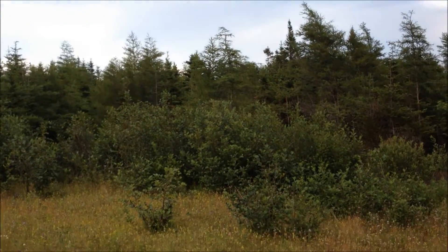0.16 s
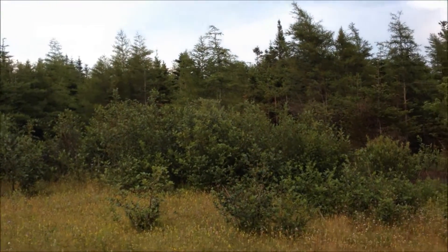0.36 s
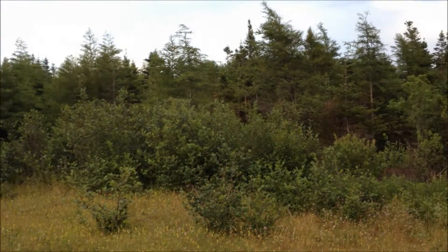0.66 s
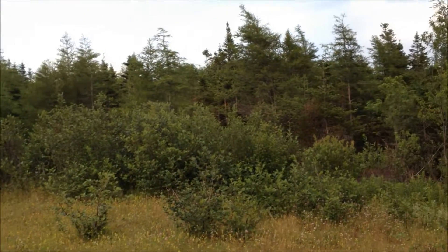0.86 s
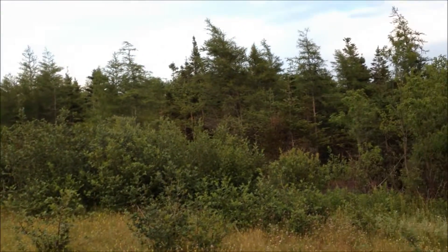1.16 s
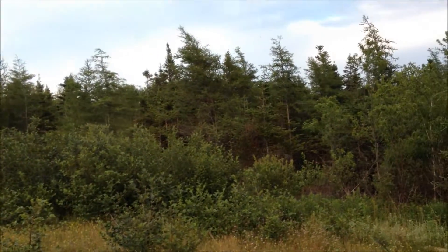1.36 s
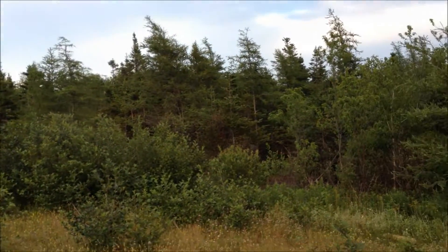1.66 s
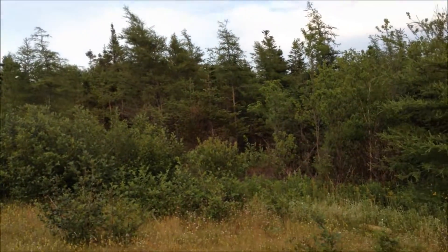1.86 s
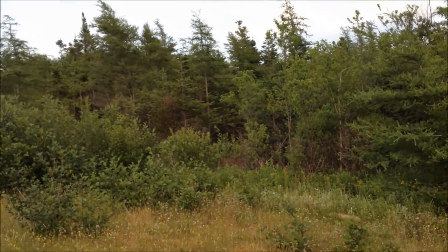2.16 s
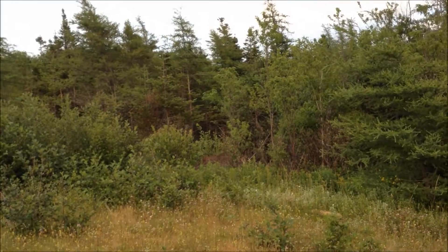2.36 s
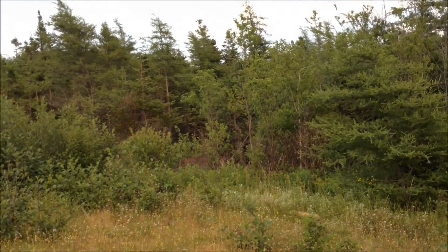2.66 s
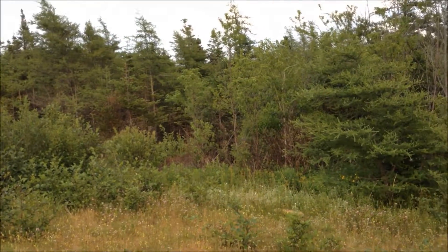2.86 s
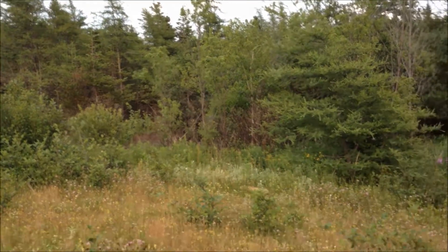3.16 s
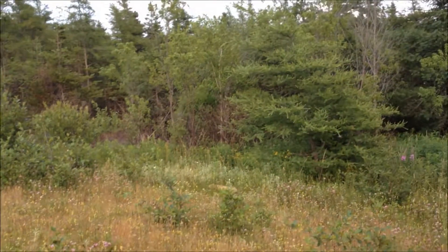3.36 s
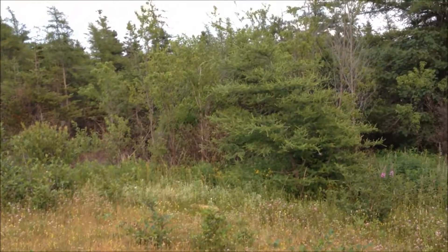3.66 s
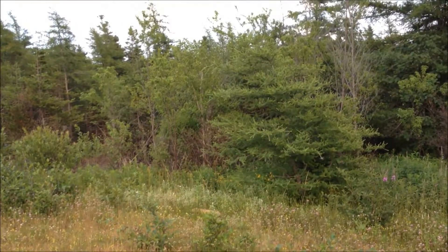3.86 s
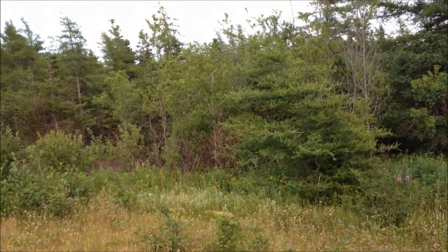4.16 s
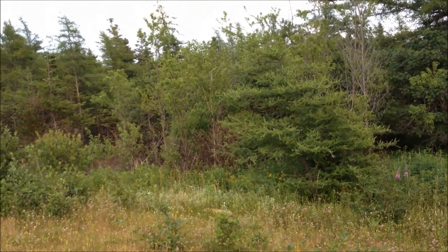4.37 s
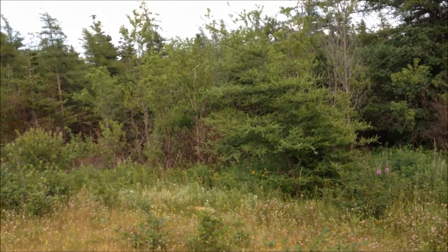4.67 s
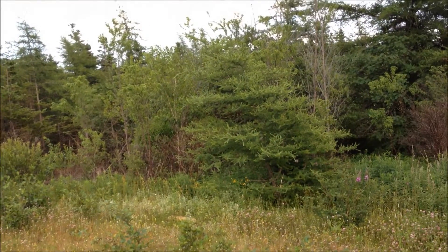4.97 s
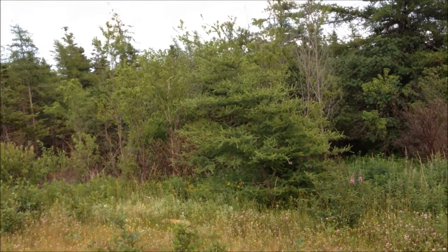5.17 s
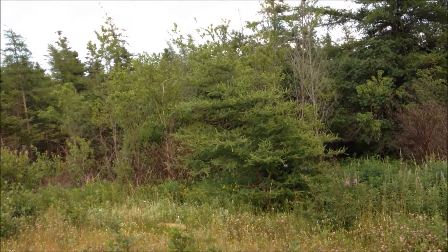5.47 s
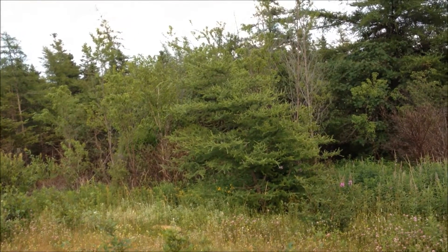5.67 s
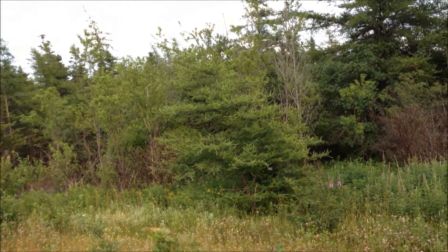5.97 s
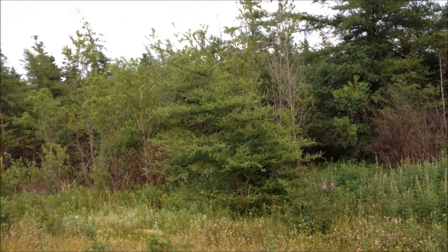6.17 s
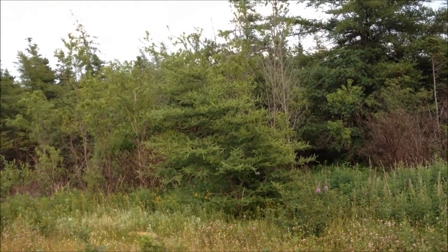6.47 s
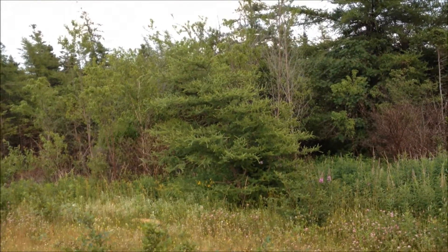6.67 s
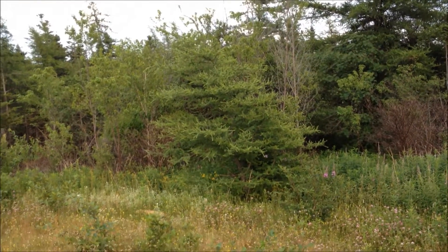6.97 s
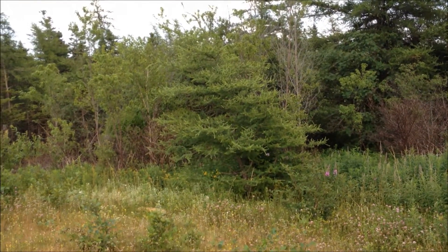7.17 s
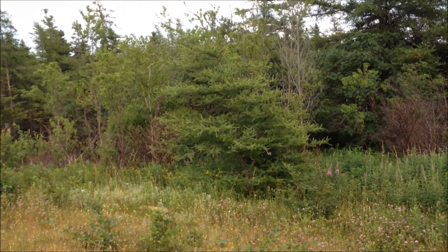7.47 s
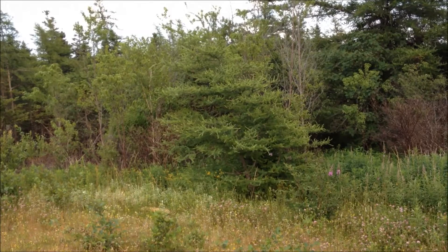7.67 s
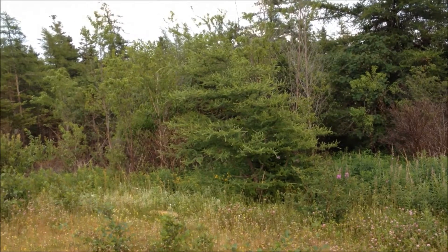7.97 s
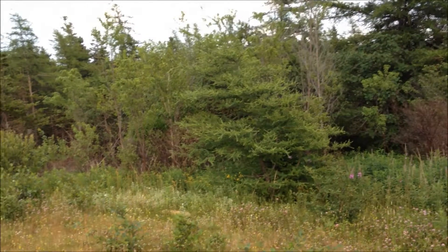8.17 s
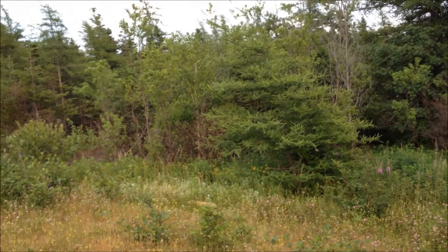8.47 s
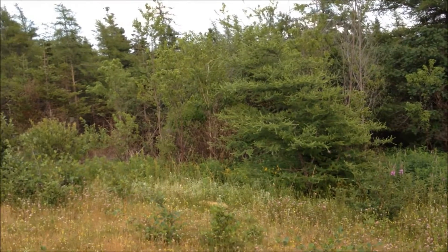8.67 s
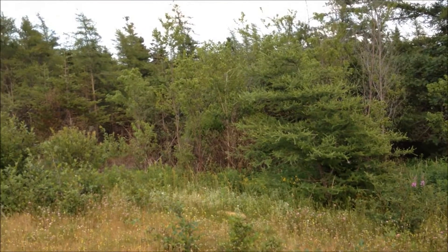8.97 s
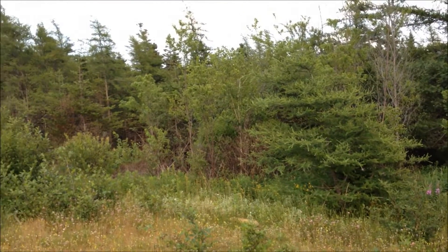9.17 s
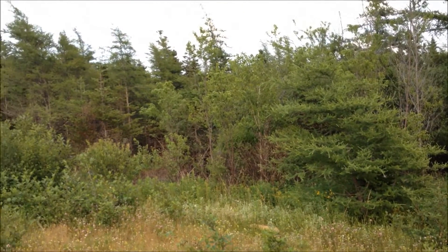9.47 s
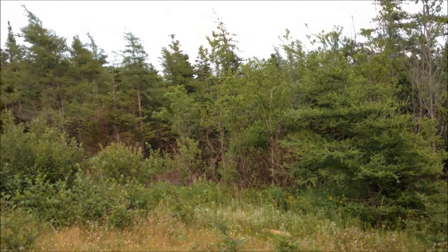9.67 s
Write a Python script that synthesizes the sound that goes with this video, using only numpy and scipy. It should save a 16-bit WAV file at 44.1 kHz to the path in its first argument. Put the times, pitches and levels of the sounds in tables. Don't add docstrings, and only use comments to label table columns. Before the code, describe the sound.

Outdoors at a wood's edge, the echo of a rough call dies away, then young hounds bay tens of metres off in long pitched cries with quick yelps at the onset. A pause holds faint bird twitter, wind thumps and grass rustle; then rougher, raspy overlapping bays return, with a thin squeal near the end. The microphone is handheld, with faint air hiss.

```python
import sys
import numpy as np
from scipy import signal
from scipy.fft import rfft, irfft
from scipy.io import wavfile
from scipy.ndimage import uniform_filter1d

SR = 44100
rng = np.random.default_rng(int(sys.argv[2]) if len(sys.argv) > 2 else 0)


def voltage_ratio(level):
    return 10 ** (np.asarray(level, float) / 20)


def store_pcm(level_fs):
    pcm = np.round(np.clip(level_fs, -1, 1) * 32767).astype(np.int16)
    wavfile.write(sys.argv[1], SR, np.atleast_2d(pcm).T)


N = 433062
T = np.arange(N) / SR


def evened(x):
    return x / np.sqrt(np.mean(x ** 2) + 1e-20)


def read(points, hz):
    f, value = np.transpose(points)
    return np.interp(np.log(hz + 1), np.log(f + 1), value)


def add(mix, s, sound):
    part = mix[round(s * SR):][:len(sound)]
    part += sound[:len(part)]


def unroll(rows):
    s, *columns = np.transpose(rows)
    t = np.arange(s[0], s[-1], 1 / SR)
    return t, [np.interp(t, s, c) for c in columns]


def phase(hz):
    return 2 * np.pi * np.cumsum(hz) / SR


def resonate(x, hz, width):
    b, a = signal.iirpeak(hz, hz / width, SR)
    return signal.lfilter(b, a, signal.lfilter(b, a, x))


def wander(length, span):
    size = int(span * SR)
    return evened(uniform_filter1d(uniform_filter1d(rng.standard_normal(length), size), size))


def coloured(colour):
    gain = voltage_ratio(read(colour, np.fft.rfftfreq(N, 1 / SR)))
    return evened(irfft(rfft(rng.standard_normal(N)) * gain, N))


# f/Hz, level/dB per Hz
AIR_COLOUR = [(40, -53), (100, -20), (170, -3.5), (350, -3.5), (700, -7), (1200, -10), (2500, -13),
              (5000, -16), (8000, -19.5), (10000, -23.5), (12500, -20.5), (15000, -17)]


def air():
    return voltage_ratio(-68) * coloured(AIR_COLOUR)


# f/Hz, level/dB per Hz
WIND_COLOUR = [(30, -36.5), (60, -19), (110, -1), (160, 0), (220, -8), (300, -21.5), (400, -59)]
# t/s of arrival, rumble level/dB
BREEZES = [
    (3.301, -83),
    (6.55, -79.5),
]
# t/s of the middle, length/s, level/dB
GUSTS = [
    (0.01, 0.027, -73),
    (.28, .1, -99),
    (3.3, 0.11, -56),
    (3.445, 0.027, -53),
    (4.6, 0.18, -74),
    (6.434, 0.13, -74),
    (7.5, .02, -74),
    (7.645, 0.016, -78),
]
# t/s, peak level/dB, f/Hz
EDDIES = [(3.239, -40, 123), (3.333, -35, 145.2), (3.413, -42, 161), (4.57, -47, 164), (4.643, -49.5, 101),
          (6.446, -38, 143), (6.715, -58, 145), (6.897, -54, 185), (7.108, -50, 192), (7.495, -50, 132),
          (7.631, -53, 127)]


def wind():
    rise, fall, gust_edge = 69, 8.4, 880
    calm_db, calm_rumble_db, buffet_over_rumble_db = -82, -101, 12
    breeze = sum(voltage_ratio(db - np.maximum(rise * (s - T), fall * (T - s))) for s, db in BREEZES)
    gusts = sum(voltage_ratio(db - gust_edge * np.maximum(abs(T - s) - length / 2, 0)) for s, length, db in GUSTS)
    buffet = voltage_ratio(calm_db) + voltage_ratio(buffet_over_rumble_db) * breeze + gusts
    out = buffet * voltage_ratio(-3.5 + 0.99 * wander(N, 0.0093)) * coloured(WIND_COLOUR)
    rumble = coloured([(30, -15.0), (75, 10.5), (130, -25.0)])
    out += (voltage_ratio(calm_rumble_db) + breeze) * voltage_ratio(1.5 * wander(N, 0.043)) * rumble
    for s, db, hz in EDDIES:
        t = np.arange(0, 2.46 / hz, 1 / SR)
        add(out, s, voltage_ratio(db - 5.5) * np.cos(2 * np.pi * hz * (t - t[-1] / 2)) * np.hanning(len(t)))
    return out


# t/s of the middle, length/s, level/dB, upper edge f/Hz
RUSTLES = [
    (0.072, .005, -60, 5000),
    (0.239, .044, -46.5, 2900),
    (4.317, 0.041, -62, 3200),
    (4.705, 0.11, -75.5, 1810),
    (5.282, 0.061, -75, 3000),
    (5.565, 0.025, -66.5, 4000),
    (8.892, 0.02, -66, 9200),
    (9.451, 0.027, -65, 965),
    (8.59, 0.14, -72.5, 7000),
    (8.79, 0.17, -71, 8500),
]
# t/s, length/s, f/Hz, level/dB
CREAKS = [
    (0.188, 0.0058, 333, -68),
    (5.247, 0.025, 650, -77),
    (5.548, 0.043, 466, -76),
]


def handling():
    out = np.zeros(N)
    for s, length, db, edge_hz in RUSTLES:
        grit = rng.standard_normal(9000) * voltage_ratio(1.6 * wander(9000, 0.0024))
        band = signal.butter(3, [220, edge_hz], "band", fs=SR)
        dull = signal.lfilter(*band, grit)[:int(length * 1.4 * SR)]
        add(out, s - 0.62 * length, voltage_ratio(db) * evened(dull) * signal.windows.tukey(len(dull), .8))
    for s, length, hz, db in CREAKS:
        t = np.arange(0, length, 1 / SR)
        add(out, s, voltage_ratio(db + 16.5) * np.sin(2 * np.pi * hz * t) * np.hanning(len(t)))
    return out


# t/s, length/s, start f/Hz, end f/Hz, level/dB
CHIPS = [
    (0.197, 0.055, 8560, 7400, -58),
    (3.221, 0.031, 8250, 7540, -63),
    (3.62, .22, 4050, 3950, -77),
    (7.375, .04, 7350, 6600, -66),
    (8.868, 0.02, 8600, 6150, -41),
    (8.875, 0.0127, 8400, 6740, -41),
    (8.886, 0.012, 6400, 4370, -60),
]
# t/s, f/Hz, level/dB
TWEETS = [(1.168, 7100, -64), (1.238, 7430, -69), (1.315, 7500, -65), (1.36, 7110, -67),
          (1.408, 7500, -65.5), (1.45, 7400, -69), (1.49, 7370, -69), (1.52, 7540, -67), (1.55, 7300, -66),
          (1.608, 7400, -62), (1.643, 7550, -69), (1.70, 7200, -72)]
# t/s, length/s, start f/Hz, warble rate/Hz, level/dB
TRILLS = [
    (3.793, 0.19, 7550, 18.5, -60),
    (4.092, 0.08, 7620, 23, -56.5),
]


def bird():
    tweet_s, tweet_rise_hz, warble_hz, sag_hz_per_s = 0.045, 120, 330, 1700
    out = np.zeros(N)
    notes = [(*row, 0, 0) for row in CHIPS]
    for s, hz, db in TWEETS:
        notes.append((s, tweet_s, hz - tweet_rise_hz / 2, hz + tweet_rise_hz / 2, db, 0, 0))
    for s, length, hz, rate, db in TRILLS:
        notes.append((s, length, hz, hz - sag_hz_per_s * length, db, rate, warble_hz))
    for s, length, from_hz, to_hz, db, rate, swing_hz in notes:
        t = np.arange(0, length, 1 / SR)
        glide = from_hz + (to_hz - from_hz) * t / length
        hz = glide + swing_hz * np.cos(2 * np.pi * rate * t) + 60 * wander(len(t), 0.0021)
        fade_db = 4.0 * (from_hz - to_hz) / 1000 * t / length
        shape = signal.windows.tukey(len(t), .6 if length > .025 else 1)
        shape = shape * voltage_ratio(3.2 * wander(len(t), 0.0072) - fade_db)
        add(out, s, voltage_ratio(db - 5.5) * shape * np.sin(phase(hz)))
    return out


# f/Hz, width/Hz, level/dB
EARLIER_LINES = [
    (760, 380, 0),
    (1068, 140, 6.5),
    (1233, 220, 7.5),
    (2030, 190, -1),
    (2520, 160, -4.5),
]


def earlier():
    noise = rng.standard_normal(N)
    lines = sum(voltage_ratio(db) * resonate(noise, f, w) for f, w, db in EARLIER_LINES)
    return voltage_ratio(-49.5 - 60 * T) * evened(lines)


def squeak(rows):
    t, (hz, db, octave_db) = unroll(rows)
    turn = phase(uniform_filter1d(hz, 200))
    tone = voltage_ratio(db + 7.5) * np.sin(turn) + voltage_ratio(octave_db + 13.0) * np.sin(2 * turn)
    return t[0], tone * signal.windows.tukey(len(t), min(800 / len(t), 1))


# t/s, pitch f/Hz, level/dB, octave level/dB
SQUEAL = [
    (7.89, 1269, -44, -69),
    (7.914, 1326, -42.5, -56.5),
    (7.946, 1359, -36, -77),
    (8.028, 1272, -41.5, -55.5),
    (8.076, 1214, -52.5, -88),
    (8.214, 1317, -56.5, -86),
    (8.3, 1240, -71, -86),
]


def squeal():
    return squeak(SQUEAL)


# t/s, length/s, start f/Hz, end f/Hz, peak level/dB
YELPS = [
    (0.827, 0.056, 1242, 880, -50),
    (1.882, 0.055, 1068, 961, -46),
    (2.063, 0.044, 989, 887, -47.5),
    (3.396, 0.071, 1156, 843, -36),
    (5.92, 0.057, 1160, 1385, -44),
    (7.4, 0.053, 990, 983, -44),
]
YELP_SHRILL = [6, 9, 0, -11, 5, 1.5]


def yelps():
    steps = [(0, 0, -9.5, -25), (0.381, 0.706, 0, 0), (1, 1, -19, 0)]
    out = np.zeros(N)
    for (s, length, from_hz, to_hz, db), shrill_db in zip(YELPS, YELP_SHRILL):
        octave_db = db + shrill_db - 21.5 + .05 * (from_hz - 1000)
        rows = [(s + u * length, from_hz + g * (to_hz - from_hz), db + d, octave_db + d + o)
                for u, g, d, o in steps]
        add(out, *squeak(rows))
    return out


# f/Hz, level/dB
OVERTONES = [(2100, 5), (2700, -17), (3150, -20), (3500, -31.5), (4100, -31), (5000, -62), (7500, -55),
             (9500, -70)]


def clean_stack(turn, hz, third_db, fourth_db, bright, gap_db):
    size = len(turn)

    def overtone(k):
        level = voltage_ratio(read(OVERTONES, k * hz) + 0.48 * k * wander(size, 0.027))
        return level * np.cos(k * turn + .4 * k * k)

    upper = voltage_ratio(gap_db) * (overtone(6) + overtone(7)) + sum(overtone(k) for k in range(8, 18))
    return_top = overtone(5) + bright * upper
    return (np.cos(2 * turn), voltage_ratio(third_db) * np.cos(3 * turn + 1),
            voltage_ratio(fourth_db) * (np.cos(4 * turn + 2)), voltage_ratio(fourth_db) * return_top)


# f/Hz, level/dB
HALVES = [(1330, 4), (1850, 0), (2400, 1.5), (2900, -29)]


def half_pitch(turn, hz, low_half_db, deep):
    halves = 0
    for k in range(5, 13, 2):
        level = voltage_ratio(read(HALVES, k * hz / 2) + 4.9 * wander(len(turn), 0.042))
        halves = halves + level * np.cos(k * turn / 2)
    lowest = 0.14 * voltage_ratio(low_half_db) * deep * np.cos(3 * turn / 2)
    return evened(halves) + lowest


def loose_folds(turn, hz):
    size = len(turn)
    puffs = (0.22 + np.cos(turn / 2) ** 2) * rng.standard_normal(size) * voltage_ratio(6.0 * wander(size, 0.0045))
    slips = turn / 2 + phase(0.038 * hz * wander(size, 0.01607))
    lines = sum(np.cos(k * slips + k * k) for k in range(2, 12))
    return evened(lines) + 0.8 * evened(puffs)


# f/Hz, width/Hz, level/dB
RASP = [
    (610, 110, -8),
    (1021, 760, 19),
    (1359, 88, 4),
    (1950, 330, 11),
    (2534, 270, 6.5),
]


def throat_rasp(chaos, low_hz, low_gain, high_rasp_db):
    tuned = [(low_hz, *RASP[0][1:])] + RASP[1:]
    bands = [voltage_ratio(db) * evened(resonate(chaos, f, w)) for f, w, db in tuned]
    middle = signal.lfilter(*signal.butter(2, 730, "high", fs=SR), sum(bands[1:3]))
    noise = low_gain * bands[0] + middle + voltage_ratio(high_rasp_db) * sum(bands[3:])
    noise = noise * voltage_ratio(2.6 * wander(len(chaos), .004))
    throat = signal.cheby1(8, 1, [460, 2700], "band", fs=SR, output="sos")
    return evened(signal.sosfilt(throat, noise))


def escaping_air(turn):
    size = len(turn)
    streaks = 0
    for k in range(10, 18):
        streaks = streaks + wander(size, 0.004) * voltage_ratio(4.3 * wander(size, 0.08)) * np.cos(k * turn)
    return evened(streaks) + 1.5 * rng.standard_normal(size)


def bay(rows, manner, throat, gap_db, low_hz, third_shift_db):
    chest_from_db, chest_to_db, half_db, nasal_db, top_db = manner
    high_rasp_db, release_s, low_half_db, low_rasp_db = throat
    t, (hz, effort_db, mouth, rasp_db) = unroll(rows)
    size, age = len(t), t - t[0]
    share = age / (t[-1] - t[0])

    third_db = np.interp(mouth, [0, 1], [-22.5, 16]) + np.interp(share, [0, 1], third_shift_db)
    fourth_db = np.interp(mouth, [0, 1], [-25.5, 13.5]) + nasal_db
    second_db = effort_db - 10 * np.log10(1 + voltage_ratio(2 * third_db) + voltage_ratio(2 * fourth_db))
    rasp, half = voltage_ratio(rasp_db), voltage_ratio(half_db + 0.65 * rasp_db)
    bright = voltage_ratio(top_db - 13 * (share - 1.5)) * np.minimum(age / .04, 1) ** 2
    bright = bright * (1 + .2 * wander(size, 0.0077)) * np.clip(1 - rasp, 0, 1) ** 2
    deep = voltage_ratio(17 * share ** 5)

    hz = uniform_filter1d(hz, 500)
    steady = phase(uniform_filter1d(hz, 900))
    hz = hz * (1 + (0.0013 + 0.012 * rasp) * wander(size, 0.0064))
    turn = phase(hz)
    chest = voltage_ratio(chest_from_db + (chest_to_db - chest_from_db) * share) * np.minimum(age / 0.071, 1)
    chest = chest * np.minimum((t[-1] - t) / release_s, 1) * np.cos(steady)

    beads = [voltage_ratio((3.0 + 4.6 * rasp) * np.minimum(wander(size, 0.023), 1)) for _ in range(3)]
    second, third, fourth, top = clean_stack(turn, hz, third_db, fourth_db, bright, gap_db)
    clean = beads[0] * second + beads[1] * third + beads[2] * fourth + top
    halves = half_pitch(turn, hz, low_half_db, deep)
    chaos = loose_folds(turn, hz)
    noise = throat_rasp(chaos, low_hz, voltage_ratio(low_rasp_db) * deep, high_rasp_db)
    gasps = escaping_air(turn)
    nearing = voltage_ratio(1.62 * t[0])
    haze = nearing * voltage_ratio(-46.5 + 1.6 * wander(size, 0.044)) * evened(resonate(gasps, 6860, 3100))
    grain = voltage_ratio(-42) * evened(resonate(gasps, 3750, 720))
    leak = voltage_ratio(-24) * (1 - share) * evened(resonate(chaos + gasps, 3200, 520))

    effort = uniform_filter1d(voltage_ratio(effort_db), 2500)
    voice = voltage_ratio(second_db + 5.5) * np.sqrt(np.clip(1 - rasp ** 2, .15, 1)) * clean
    voice += voltage_ratio(2.0) * chest
    voice += effort * (half * halves + rasp * (noise + leak) + haze + grain)
    return t[0], voice * signal.windows.tukey(size, 1300 / size)


# t/s, pitch f/Hz, effort level/dB, mouth opening/0-1, rasp level/dB against effort
PUSH_1 = [(.845, 546.4, -38, 0.4, 2), (.881, 588.2, -37.5, 0.81, -24), (.959, 572, -40, 0.37, -30),
          (.985, 561.5, -47, 0.58, -8), (1.01, 530, -30, 0.9, -6.5)]
PUSH_2 = [(.995, 529.4, -47, 0.94, -5.5), (1.027, 516.8, -39.5, 1, -20), (1.071, 562.3, -34.5, 0.31, -52),
          (1.151, 526.5, -38, 0.96, -15.5), (1.254, 510.6, -37.5, 0.23, -27.5),
          (1.336, 530, -38, 0.88, -55), (1.432, 506.2, -40, 0.45, -24), (1.5, 499.8, -38, 0.4, -20.5),
          (1.562, 495, -41.5, 0.33, -12.5), (1.603, 492, -51.5, 0.59, 6)]
PUSH_3 = [(2.065, 504.5, -42.5, 0.74, -5), (2.129, 570, -33.5, 0.63, -43.5), (2.18, 534, -33, 0.61, -45),
          (2.398, 526.6, -33.5, 0.31, -50), (2.527, 533.7, -38, 0.75, -37.5), (2.677, 507, -32, 0.43, -44),
          (2.739, 524, -35.5, 0.65, -36), (2.874, 531.8, -31.5, 0.65, -38.5),
          (2.97, 520.5, -33.5, 0.55, -33.5)]
PUSH_4 = [(2.958, 524.2, -34, 0.75, -15), (2.996, 525.2, -39, 0.72, -6.5), (3.019, 505.8, -40.5, 0.87, -5),
          (3.055, 520.8, -39.5, 0.41, -1), (3.091, 494.6, -45, 0.3, -7), (3.124, 498.4, -48, 0.3, 0.5),
          (3.17, 497, -69, 0.3, 1)]
PUSH_5 = [(3.415, 459.5, -43, 0.38, -5), (3.446, 485.6, -43.5, 0.87, -8.5),
          (3.481, 502.7, -40.5, 0.51, -4.5), (3.522, 534, -41, 0.56, -30), (3.56, 525.2, -44, 1, -20),
          (3.601, 512.5, -44, 0.93, -1)]
PUSH_6 = [(5.949, 506, -50, 0.47, 0.5), (5.976, 574, -45, 0.48, -9), (5.999, 581, -41.5, 0.5, -7.5),
          (6.053, 570.6, -41.5, 0.26, -17.5), (6.115, 563, -43.5, 0.21, -6.5),
          (6.178, 560, -35.5, 0.037, -25), (6.222, 545, -36, 0.039, -13.5), (6.271, 526, -45.5, 0.28, 2.5),
          (6.319, 492, -38.5, 0.27, -4)]
PUSH_7 = [(6.305, 495.5, -37.5, 0.22, -4), (6.344, 534.6, -40.5, 0.75, -0.5),
          (6.389, 578.7, -33, 0.33, -8.5), (6.504, 536, -37.5, 0.38, -4), (6.55, 530.5, -37.5, 0.63, -0.5),
          (6.64, 530, -42, 0.34, 0), (6.667, 567, -55, 0.85, 8.5)]
PUSH_8 = [(6.649, 510.3, -36.5, 0.3, -9), (6.683, 536.4, -49.5, 0.46, -2), (6.753, 537.7, -42.5, 0.86, -33),
          (6.809, 524.7, -45.5, 0.64, -34), (6.85, 534, -65, .65, -32)]
PUSH_9 = [(6.825, 519.3, -42.5, 0.68, -23), (6.926, 510, -41.5, 0.45, -20), (6.999, 499.6, -45, 0.57, -18),
          (7.096, 513.3, -41.5, 0.44, -26), (7.13, 492.7, -43.5, 0.33, -18),
          (7.195, 503.6, -42.5, 0.92, -16), (7.235, 498.4, -49, 0.29, -1.5), (7.282, 488, -50, 0.25, 3)]
PUSH_10 = [(7.42, 514.4, -44.5, 0.92, 4), (7.48, 572.4, -40.5, 0.59, -10), (7.576, 511.5, -34, 0.35, -9),
           (7.611, 541, -41.5, 0.6, -1), (7.691, 526.8, -39.5, 0.27, -0.5),
           (7.728, 532.8, -40.5, 0.29, -3.5), (7.798, 538.6, -39, 0.3, -5.5),
           (7.84, 553.6, -41, 0.44, -2.5), (7.89, 537, -40, 0.97, 1)]
PUSH_11 = [(7.875, 527.2, -36.5, 0.5, 6), (7.941, 554.2, -39, 0.91, -20), (8.006, 534, -37, 0.39, -8.5),
           (8.064, 502.7, -36.5, 0.44, -23.5), (8.108, 521, -41, 0.45, -14),
           (8.154, 511.9, -41.5, 0.6, -11.5), (8.301, 495.4, -46, 0.62, -21),
           (8.371, 489.3, -48.5, 0.41, -1.5), (8.402, 474, -52.5, 0.58, 7)]
PUSH_12 = [(8.954, 438, -53, 0.46, -9), (8.984, 513, -45, 0.91, -15), (9.019, 521.3, -42.5, 0.73, -30),
           (9.067, 524.5, -40.5, 0.48, -30), (9.104, 533.2, -48, 0.99, -26), (9.139, 518, -57.5, 0.42, 0.5),
           (9.184, 516, -53, 1, 6.5)]
# chest note level/dB at start, at end, half-pitch level/dB, fourth overtone level/dB,
# top overtones level/dB
MANNERS = [(-33, -36, -15, 5.5, -4), (-44, -51, -1, 1, -20), (-47, -49.5, -7.5, 0.3, -15),
           (-46.5, -64.5, -2.5, -2, -16), (-49.5, -37.5, -10, -2, -8), (-34, -56, -8, 3, 4),
           (-40, -37.5, -7.5, 1.5, 8.5), (-31.5, -49, -0.5, -0.5, -0.5), (-58.5, -55, -4.5, 1.5, -21),
           (-52.5, -56, -11, -2, -5), (-47, -59.5, -15, 1, -9), (-46, -39.5, -8, -0.2, -14)]
# upper rasp level/dB, chest release/s, lowest half-pitch level/dB, low rasp level/dB
THROATS = [(1.5, 0.0047, 9, -1), (-2, 0.037, 1.5, 1.5), (3, 0.0093, -2.5, 3), (-2, 0.036, 3, -3),
           (0, 0.081, -4, 1), (-6.5, 0.011, -9, -13), (-5.5, 0.0072, 12.5, -8), (-1, 0.0087, -3, 2),
           (-1.5, 0.033, -1.5, 8.5), (-4.5, 0.0091, -6, -13), (4, 0.017, -1, 16.5), (-1, 0.046, -4, -5)]
GAPS = [-12, -16, -6, -4, -12, -12, -11, -20, -18, -16, -15, -12]
LOW_RASP = [640, 790, 640, 800, 800, 640, 760, 640, 704, 760, 579, 640]
# level/dB at start, level/dB at end
THIRD_SHIFTS = [(0.1, 0.1), (-0.34, 1.8), (3, 0.1), (0.1, 0.1), (1.3, 0.1), (-0.19, 0.1), (-0.7, 0.1),
                (1.8, 1.4), (0.1, 4.9), (-1, 0.1), (-1, 2), (0.61, 0.1)]


def baying():
    out = np.zeros(N)
    pushes = [PUSH_1, PUSH_2, PUSH_3, PUSH_4, PUSH_5, PUSH_6,
              PUSH_7, PUSH_8, PUSH_9, PUSH_10, PUSH_11, PUSH_12]
    for push in zip(pushes, MANNERS, THROATS, GAPS, LOW_RASP, THIRD_SHIFTS):
        add(out, *bay(*push))
    return out


# f/Hz, t60/s
WOOD_DECAY = [(400, 0.94), (1060, 1.07), (1600, 0.99), (2790, 0.64), (5000, 0.94), (7500, 0.24)]
# f/Hz, level/dB
LEAVES = [(500, -4), (1000, -2.5), (1500, -0.9), (3000, 1), (7500, 8.5)]
# delay t/s, level/dB
TRUNKS = [
    (.011, -17.5),
    (.027, -20),
    (.046, -19),
    (.071, -20),
]


def wood(x):
    taps, trunks = np.zeros((2, SR))
    at = np.arange(300, SR - 20, 20)
    taps[at + rng.integers(0, 20, len(at))] = rng.choice([-1., 1.], len(at))
    hz, t, z = signal.stft(taps, SR, nperseg=256)
    decay_db = -60 * t / read(WOOD_DECAY, hz)[:, None] + read(LEAVES, hz)[:, None]
    tail = signal.istft(z * voltage_ratio(decay_db), SR, nperseg=256)[1][:SR]
    tail *= voltage_ratio(-5) / np.sqrt(np.log(1000) ** -1 * SR / 40)
    for delay, db in TRUNKS:
        trunks[int(delay * SR)] = voltage_ratio(db)
    near = signal.fftconvolve(x, signal.lfilter(*signal.butter(2, 3500, fs=SR), trunks))[:N]
    sway_s, span_s = .00008, .022
    scatter = np.interp(T + sway_s * wander(N, span_s), T, signal.fftconvolve(x, tail)[:N])
    return x + near + scatter * voltage_ratio(.6 * wander(N, span_s))


def scene():
    far = bird() + yelps() + baying()
    add(far, *squeal())
    return (air() + wind() + handling() + earlier() + voltage_ratio(-1.0) * wood(far))[None]


def masked(x):
    z = signal.stft(x, nperseg=1024, noverlap=768)[2]
    power = uniform_filter1d(uniform_filter1d(abs(z) ** 2, size=5, axis=0), size=3, axis=1)
    shadow = signal.lfilter([.1], [1, -.85], power, axis=0)
    over_db = 10 * np.log10(power / (shadow + 1e-20) + 1e-20)
    keep = np.clip((over_db + 25) / 3, .04, 1)
    return signal.istft(z * keep, nperseg=1024, noverlap=768)[1][:N]


def band_limit(x):
    return signal.sosfilt(signal.butter(12, 16220, fs=SR, output="sos"), x)


def record(dry):
    edge = signal.firwin(511, 15330, window=("kaiser", 9), fs=SR)
    mix = signal.oaconvolve(masked(dry[0]), edge, "same")[None]
    return band_limit(mix)


dry = scene()
out = record(dry)
store_pcm(out)
```